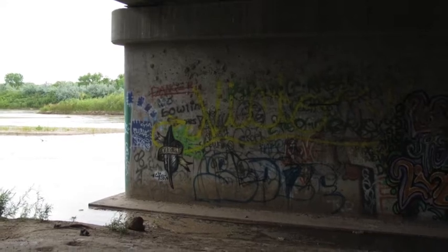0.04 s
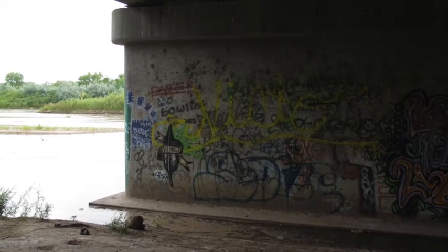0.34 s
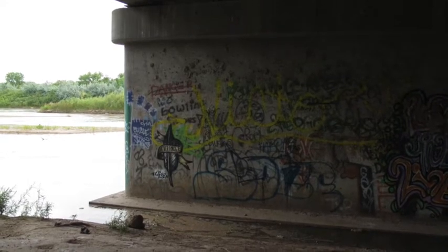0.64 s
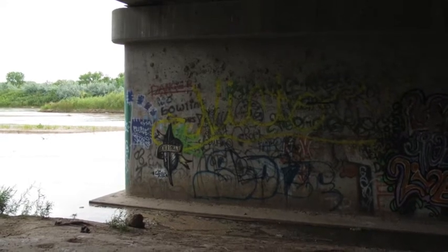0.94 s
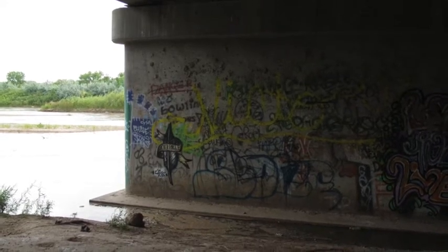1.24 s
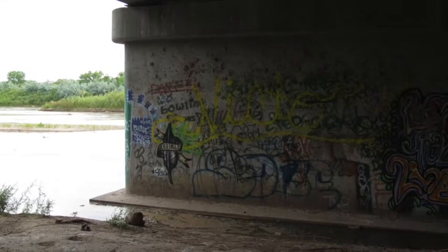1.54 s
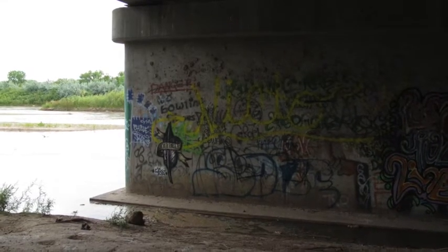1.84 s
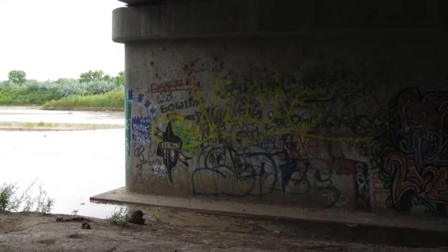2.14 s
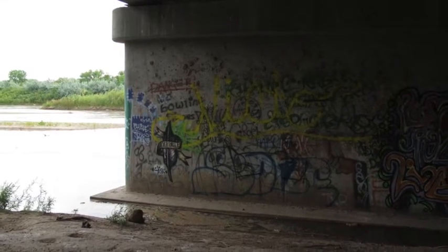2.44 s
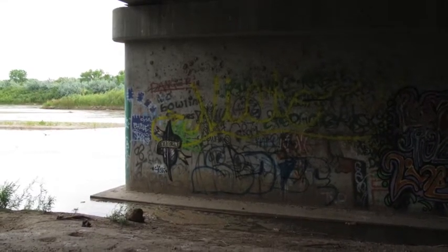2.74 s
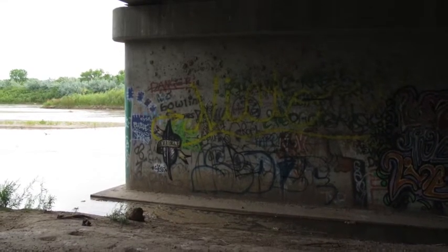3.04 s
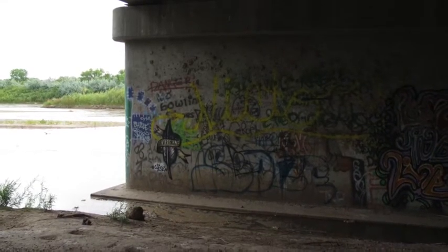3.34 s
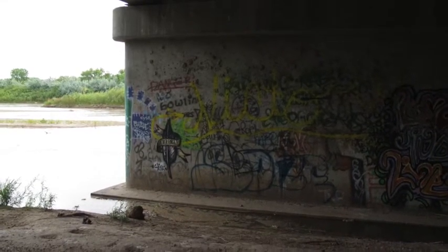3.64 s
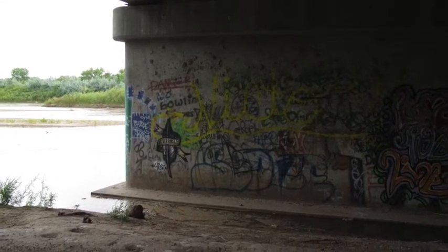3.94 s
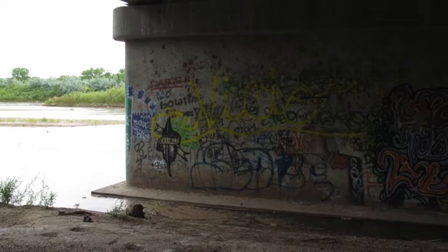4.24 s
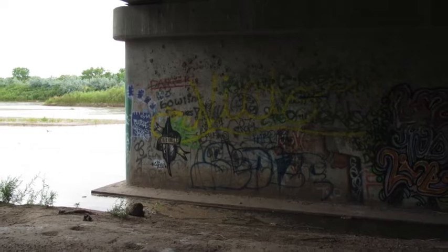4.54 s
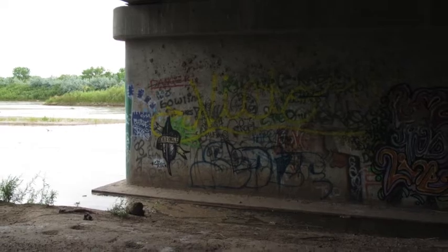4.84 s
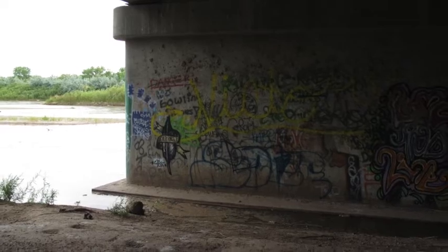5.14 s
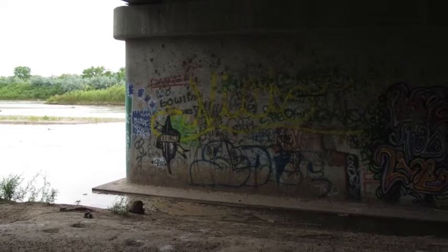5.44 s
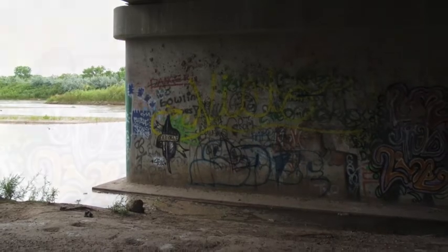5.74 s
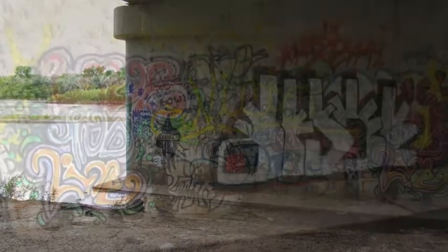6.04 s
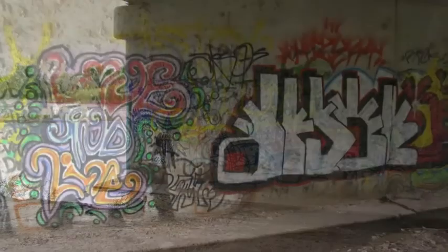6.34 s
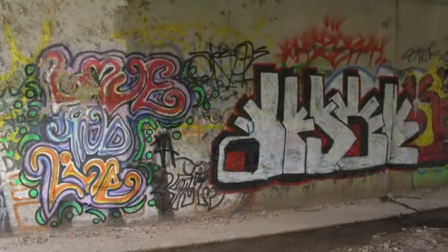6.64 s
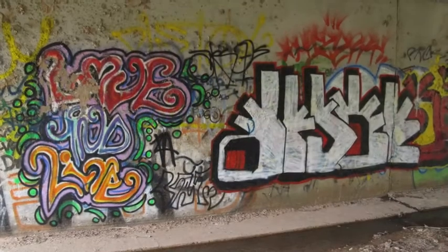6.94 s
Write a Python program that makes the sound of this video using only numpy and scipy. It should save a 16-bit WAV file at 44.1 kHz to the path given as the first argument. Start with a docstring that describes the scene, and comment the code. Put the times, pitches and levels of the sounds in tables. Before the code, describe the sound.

Traffic crosses a concrete bridge overhead as a deep, rumbling drone. It eases at first, with light wind on the microphone and a few raspy bird calls, then builds as tyres roar and whine and axles thump over a joint. Near the end a heavy vehicle bangs and booms across, briefly overloading the microphone. Faint river hiss and thin chirps lie underneath.

```python
"""Under a concrete road bridge, beside a pier on the river bank.
Traffic overhead drives the deck's modes; tyres roar and whine, axles bang over a joint, a wheel hops
and an engine moves off. A heavy vehicle overloads the microphone. Small birds chirp and rasp,
something squeaks very high under the deck, gusts buffet the microphone and the river hisses."""
import sys
import numpy as np
from scipy import signal
from scipy.fft import rfft, irfft
from scipy.io import wavfile
from scipy.ndimage import uniform_filter1d

SR = 44100
rng = np.random.default_rng(int(sys.argv[2]) if len(sys.argv) > 2 else 0)


def store_pcm(level_fs):
    """Save levels as 16-bit WAV."""
    pcm = np.round(np.clip(level_fs, -1, 1) * 32767).astype(np.int16)
    wavfile.write(sys.argv[1], SR, np.atleast_2d(pcm).T)


N = 307906
T = np.arange(N) / SR
FREQS = np.maximum(np.arange(N // 2 + 1) * SR / N, 1)


# vehicles rolling onto the span, ending with a heavy one and its trailer:
# (time [s], stay [s], span flexing [dB], slab drone [dB], growl [dB], roar [dB])
VEHICLES = [(-.3, 1.5, -13.5, -28, -43, -71), (.25, 1.2, -25.5, -26, -53, -64),
            (2.25, 1.1, -34, -23.5, -31, -37.5), (3.12, 1.48, -7.5, -12.5, -17, -28.5),
            (4.819, 0.75, -8, -9.5, -17, -29), (5.68, .4, -3.5, -4, -17.5, -29.5),
            (6.125, 0.57, -3, -7.5, -20.5, -37)]
# modes of the whole span and of the slab: (frequency [Hz], width [Hz], gain [dB])
SPAN_MODES = [(43.7, 9.8, -3), (65, 18.4, 2), (77, 8.1, -9)]
SLAB_MODES = [(89.7, 9.7, -1.5), (105.8, 7.2, -2), (126.7, 15, -4), (225, 13, -9)]
HEAVE_RE_FLEX_DB = -17.5

def deck():
    """Rolling wheels shake the slab without pause; heavy loads flex the span and make it heave."""
    span_db, slab_db = np.transpose(VEHICLES)[2:4]
    span = traffic_level(span_db, far_db=-28, rise_s=0.17, slope_db_per_s=-4, t60_s=2.2)
    slab = traffic_level(slab_db, far_db=-24, rise_s=0.045, slope_db_per_s=-3.5, t60_s=2)
    heave = from_db(HEAVE_RE_FLEX_DB) * steadied(noise(colour(RUMBLE_SPECTRUM)), window_s=0.4)
    return diffused(resonant(SPAN_MODES) + heave, span) + diffused(resonant(SLAB_MODES), slab)


def traffic_level(levels_db, far_db, rise_s, slope_db_per_s, t60_s):
    """Each vehicle builds up, stays and dies away; all add in power to the steady far traffic."""
    power = from_db(far_db) ** 2
    for (start_s, stay_s, *_), db in zip(VEHICLES, levels_db):
        rolling = from_db(db + slope_db_per_s * np.maximum(T - start_s, 0))
        power = power + (rolling * burst(start_s, stay_s, rise_s, t60_s)) ** 2
    return np.sqrt(power)


def resonant(modes):
    """Noise ringing in a set of modes, at an even level."""
    power = sum(from_db(db) ** 2 / (1 + detuning(hz, width_hz) ** 2) for hz, width_hz, db in modes)
    radiated = np.sqrt(power) * band(hz=99, width_hz=213)
    return steadied(noise(radiated), window_s=0.14)


def diffused(drone, level, direct_db=-9, widening_db_per_db=0.28):
    """A drone at a given level: the farther and fainter, the more it arrives from all sides."""
    mid, side = (drone[0] + drone[1]) / 2, (drone[0] - drone[1]) / 2
    spread = (level / from_db(direct_db)) ** -widening_db_per_db
    return level * (mid + spread * side * [[1], [-1]])


# axles striking the joint: (time [s], bang [dB], boom [dB], knock [dB])
AXLES = [(.28, -24.5, -32.5, -42), (3.125, -19, -30, -19), (3.24, -32.5, -20.5, -30),
         (3.465, -18, -9.5, -15.5), (4.891, -14.5, -28, -17), (4.985, -23.5, -13.5, -23.5),
         (5.679, 0, -7.5, -18), (5.765, -8, -9, -14.5), (6.126, -2, -4.5, -11), (6.16, 1.5, -4.5, -11.5),
         (6.33, -8, -1, -18)]
# ring of the joint: (frequency [Hz], density [dB])
KNOCK_SPECTRUM = [(250, -22.5), (370, 10), (450, 10.5), (560, 1), (700, -12.5), (1200, -21.5), (3000, -53)]
# bang between the piers: (centre [Hz], width [Hz], gain [dB], t60 [s])
BANG_BANDS = [(108.4, 35.3, -0.5, 1.6), (184.8, 13.7, -2.5, 1.49), (271, 126, -5.5, 1.33),
              (624, 420, -18.5, 1), (1230, 890, -22, 0.45), (2360, 1500, -32, 0.42),
              (4950, 4800, -45.5, 0.88)]
# struck span, upper two modes beating: (frequency [Hz], gain [dB], t60 [s])
BOOM_MODES = [(44.13, -2, 3.86), (65.22, 2, 4.46), (73.72, -2.5, 1.43)]

def joint():
    """Each axle knocks the joint, bangs between the piers, lows longest, and sets the span booming."""
    times_s, bang_db, boom_db, knock_db = np.transpose(AXLES)

    def blows(levels_db, t60_s):
        """Overlapping blows add in power."""
        each = (from_db(db) * struck(s, 0.004, t60_s) for s, db in zip(times_s, levels_db))
        return np.sqrt(sum(blow ** 2 for blow in each))

    out = blows(knock_db, t60_s=0.88) * noise(colour(KNOCK_SPECTRUM))
    for hz, width_hz, band_db, t60_s in BANG_BANDS:
        ring = steadied(noise(band(hz, width_hz)), window_s=0.075)
        out += from_db(band_db) * blows(bang_db, t60_s) * ring
    for start_s, db, phase in zip(times_s, boom_db, rng.uniform(0, 2 * np.pi, len(AXLES))):
        for hz, mode_db, t60_s in BOOM_MODES:
            mode = np.sin(2 * np.pi * hz * (T - start_s) + phase)
            out += from_db(db + mode_db) * struck(start_s, 0.0076, t60_s) * mode
    return out


# tread noise round the deck, through the slab, and direct from the edge: (frequency [Hz], density [dB])
ROAR_SPECTRUM = [(200, -5.5), (500, -12.5), (700, 2.5), (860, 0.5), (1060, 1), (1400, -6), (1900, -10.5),
                 (2700, -22), (4000, -33), (8000, -52.5), (16000, -55.5)]
GROWL_SPECTRUM = [(60, -34.5), (170, -4), (235, 0), (320, -5.5), (450, -8.5), (620, -11), (900, -19.5),
                  (2000, -62)]
EDGE_SPECTRUM = [(250, -10), (600, 0), (850, 1.5), (1400, -1.5), (2000, -8.5), (2800, -20), (4500, -27.5),
                 (9000, -43)]

def tyres():
    """Tread noise spills round the deck, its lows pass through the slab; one car nears the open edge."""
    growl_db, roar_db = np.transpose(VEHICLES)[4:]
    roar = traffic_level(roar_db, far_db=-37, rise_s=0.15, slope_db_per_s=1, t60_s=3.5)
    growl = traffic_level(growl_db, far_db=-31, rise_s=0.17, slope_db_per_s=-1.2, t60_s=3.6)
    edge_pass = from_db(-25.5) * swell(peak_s=4.35, half_width_s=0.49)
    indirect = roar * noise(colour(ROAR_SPECTRUM)) + growl * noise(colour(GROWL_SPECTRUM))
    return indirect + edge_pass * noise(colour(EDGE_SPECTRUM))


# wheel bounces after the joint: (time [s], level [dB])
HOPS = [(3.455, 4.5), (3.582, 2.5), (3.69, -0.5), (3.82, -3)]
HOP_HZ, HOP_S = 77.5, 0.0896

def wheel_hops():
    """A bouncing wheel presses the slab in short, deep pulses."""
    out = np.zeros(N)
    for start_s, db in HOPS:
        press = np.sin(np.pi * np.clip((T - start_s) / HOP_S, 0, 1)) ** 2
        out += from_db(db) * press * np.sin(2 * np.pi * (HOP_HZ * T + rng.random()))
    return out


# tread tones: (peak time [s], half-width [s], pitch at peak [Hz], glide [Hz/s], level [dB])
WHINES = [(1.95, 0.73, 814, -4, -42), (4.45, 0.39, 785, -50, -32), (5.3, .85, 860.4, 32, -30.5),
          (6.75, 0.29, 968, 70.5, -40)]

def tread_whine():
    """Tread blocks slap the road at a rate set by speed: an unsteady tone, gliding as the car passes."""
    blur = lowpass(hz=30)
    out = np.zeros((2, N))
    for peak_s, half_width_s, hz, glide_hz_per_s, db in WHINES:
        phase = 2 * np.pi * np.cumsum(hz + glide_hz_per_s * (T - peak_s)) / SR
        tone = unit_rms(noise(blur) * np.cos(phase) + noise(blur) * np.sin(phase))
        out += from_db(db) * swell(peak_s, half_width_s) * tone
    return out


# engine moving off: (time [s], cycle rate [Hz], level [dB])
ENGINE_CURVE = [(.1, 31.16, -32), (.45, 31.1, -23.5), (1.1, 30.9, -37), (1.7, 30.34, -41), (2.4, 30.4, -65)]
# exhaust orders: (multiple of cycle rate, gain [dB])
ENGINE_ORDERS = [(2, 3), (4, -1), (5, 4), (6, -10.5), (7, -22)]

def engine():
    """The slab lets through only the lowest, rough orders of an exhaust."""
    times_s, rate_hz, level_db = np.transpose(ENGINE_CURVE)
    wander_rad = 0.36 * noise(band(hz=1, width_hz=2.2))
    phase = 2 * np.pi * np.cumsum(np.interp(T, times_s, rate_hz)) / SR + wander_rad
    exhaust = sum(from_db(db) * np.sin(order * phase) for order, db in ENGINE_ORDERS)
    return from_db(np.interp(T, times_s, level_db)) * exhaust


# harsh calls: (time [s], length [s], note pitch [Hz], note [dB], rasp [dB], pan L-R [dB])
RASPS = [(0.748, 0.043, 5460, -37.5, -43, -4), (0.883, 0.052, 5900, -43, -45, -2),
         (1.91, .02, 6840, -49, -46.5, 0)]
# their rasp: (frequency [Hz], density [dB])
RASP_SPECTRUM = [(3000, -25), (4500, 2), (5400, -1), (6800, -2), (9000, -3), (10800, -7), (12500, -7),
                 (15500, -6)]

def bird_rasps():
    """A harsh call opens on a short note with its octave; a grainy rasp outlasts it."""
    grain = 1 + 0.27 * noise(band(hz=200.8, width_hz=370))[0]
    grainy_noise = grain * noise(colour(RASP_SPECTRUM))
    waver_rad = noise(band(hz=120.6, width_hz=200))
    out = np.zeros((2, N))
    for start_s, length_s, hz, note_db, rasp_db, pan_db in RASPS:
        phase = 2 * np.pi * hz * T + waver_rad
        tone = np.sin(phase) + 0.5 * np.sin(2 * phase)
        note = from_db(note_db) * burst(start_s, length_s=0.012, rise_s=0.002, t60_s=0.13) * tone
        rasp = from_db(rasp_db) * burst(start_s, length_s, rise_s=0.002, t60_s=0.22) * grainy_noise
        out += (note + rasp) * from_db([[pan_db / 2], [-pan_db / 2]])
    return out


# small birds: (time [s], length [s], pitch [Hz], level [dB])
CHIRPS = [(1.685, 0.064, 7170, -61), (1.8, 0.07, 7810, -57), (1.92, 0.022, 10300, -55),
          (2.506, 0.053, 7840, -54.5), (3.918, 0.027, 7300, -54), (4.013, 0.087, 7520, -54),
          (4.36, .09, 7790, -53), (4.536, 0.052, 8000, -55), (4.749, 0.022, 13400, -53),
          (5.196, .06, 8250, -60), (5.32, .06, 8000, -55.5), (6.375, 0.027, 13740, -47),
          (6.61, 0.018, 8500, -51.5), (6.827, 0.068, 8100, -53.5)]

def bird_chirps():
    """Thin, slightly rough chirps, blurred by the concrete."""
    out = np.zeros(N)
    for start_s, length_s, hz, db in CHIRPS:
        tone = np.sqrt(2) * np.sin(2 * np.pi * hz * T)
        out += from_db(db) * burst(start_s, length_s, rise_s=0.0078, t60_s=0.11) * tone
    return out * noise(lowpass(hz=220))


# very high pips: (time [s], relative level [dB])
SQUEAKS = [(0.2748, -39), (1.6544, -46), (2.2428, -36), (2.7117, -37), (3.0422, -48), (3.3453, -44),
           (3.6257, -42), (3.9215, -41), (4.6254, -44), (5.662, -39)]

def squeaks(gain_db=-8.5):
    """Pips at the edge of hearing ring on under the deck, to the right."""
    level = sum(from_db(db + gain_db) * struck(s, rise_s=0.004, t60_s=0.26) for s, db in SQUEAKS)
    return level * noise(band(hz=15620, width_hz=400)) * from_db([[-2], [2]])


# gusts: (peak time [s], half-width [s], level [dB])
GUSTS = [(0.121, .2, -20.5), (1.5, 0.88, -24.5)]
# wind rumble, also the deck's heave: (frequency [Hz], density [dB])
RUMBLE_SPECTRUM = [(5, -18.5), (12, 5.5), (22, 7), (32, 8.5), (60, -19.5), (200, -43.5)]

def breeze():
    """Light gusts buffet the microphone."""
    level = sum(from_db(db) * swell(peak_s, half_width_s) for peak_s, half_width_s, db in GUSTS)
    return level * steadied(noise(colour(RUMBLE_SPECTRUM)), window_s=0.4)


# river hiss, also the recorder's: (frequency [Hz], density [dB])
HISS_SPECTRUM = [(500, -9.5), (1500, 5.5), (3000, 0.5), (5000, -5), (8200, -12), (9800, -18.5),
                 (16000, -22.5)]

def river(level_db=-44.5):
    """The river hisses steadily."""
    return from_db(level_db) * noise(colour(HISS_SPECTRUM))


# sound field under the deck: (frequency [Hz], left-right correlation [0..1])
COHERENCE = [(30, .88), (65, 0.93), (130, 0.9), (250, 0.79), (500, 0.71), (1000, 0.69), (2000, 0.72),
             (4000, 0.34), (10000, 0.63)]

def noise(gain):
    """Unit-rms stereo noise of a given colour, most alike left and right in the bass."""
    alike = over_hz(COHERENCE)
    mid, side = rfft(rng.standard_normal((2, N)))
    stereo = np.sqrt(1 + alike) * mid + np.sqrt(1 - alike) * side * [[1], [-1]]
    return unit_rms(irfft(gain * stereo, N))


def steadied(x, window_s):
    """A continuous drive keeps the slow level of a narrow resonance even."""
    power = uniform_filter1d(np.mean(x ** 2, axis=0), int(window_s * SR))
    return x / np.sqrt(np.abs(power) + 1e-9)


def struck(start_s, rise_s, t60_s):
    """Envelope that builds up and dies away."""
    age_s = np.maximum(T - start_s, 0)
    return (1 - np.exp(-age_s / rise_s)) * from_db(-60 * age_s / t60_s)


def burst(start_s, length_s, rise_s, t60_s):
    """Envelope that ramps up, holds and dies away."""
    tail_s = np.maximum(T - start_s - length_s, 0)
    return np.clip((T - start_s) / rise_s, 0, 1) * from_db(-60 * tail_s / t60_s)


def swell(peak_s, half_width_s):
    """Envelope of something that nears and recedes."""
    return 1 / (1 + ((T - peak_s) / half_width_s) ** 2)


def colour(spectrum):
    """Gain of a spectrum table, falling away above its last point."""
    top_hz = spectrum[-1][0]
    return from_db(over_hz(spectrum)) * np.minimum(top_hz / FREQS, 1) ** 2


def over_hz(points):
    """A table interpolated over log frequency."""
    hz, value = np.transpose(points)
    return np.interp(np.log(FREQS), np.log(hz), value)


def band(hz, width_hz):
    """Gain of a steep-sided band."""
    return 1 / (1 + detuning(hz, width_hz) ** 4)


def detuning(hz, width_hz):
    return (FREQS - hz * hz / FREQS) / width_hz


def lowpass(hz):
    return 1 / (1 + (FREQS / hz) ** 2)


def from_db(db):
    return 10 ** (np.asarray(db) / 20)


def unit_rms(x):
    return x / np.sqrt(np.mean(x ** 2) + 1e-20)


def scene():
    """The bridge overhead, with breeze, river and wildlife below it."""
    water = river()
    traffic = deck() + engine() + tyres() + tread_whine() + joint() + wheel_hops()
    return traffic + breeze() + water + bird_chirps() + squeaks() + bird_rasps()


CLIP_LEVEL, RECORDER_HISS_DB, CUTOFF_HZ, FADE_S = 0.97, -58, 15900, 0.001

def record(dry):
    """The input overloads into flat tops; a faint hiss runs on through them; the top treble is cut."""
    clipped = np.clip(dry, -CLIP_LEVEL, CLIP_LEVEL)
    hiss = from_db(RECORDER_HISS_DB) * noise(colour(HISS_SPECTRUM))
    fade = np.minimum(np.minimum(T, T[-1] - T) / FADE_S, 1)
    treble_cut = signal.ellip(10, 0.1, 80, CUTOFF_HZ, fs=SR, output="sos")
    return signal.sosfilt(treble_cut, fade * (clipped + hiss))


dry = scene()
out = record(dry)
store_pcm(out)
```